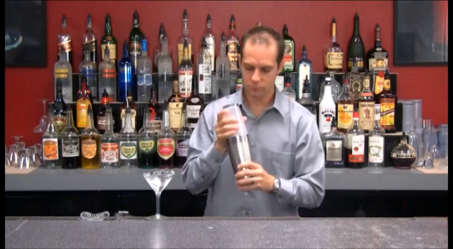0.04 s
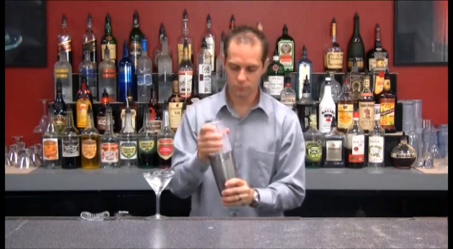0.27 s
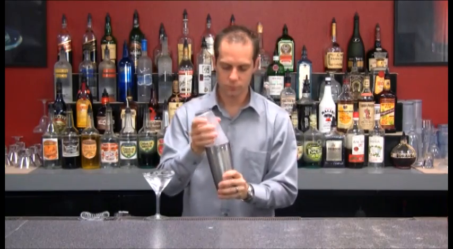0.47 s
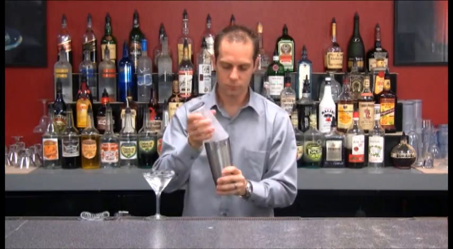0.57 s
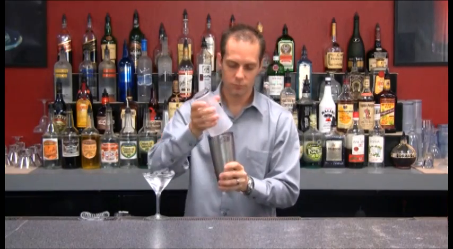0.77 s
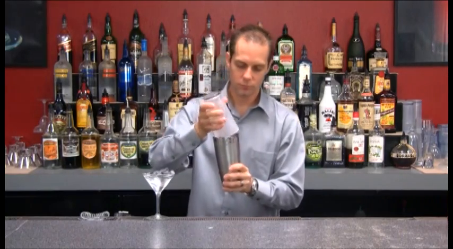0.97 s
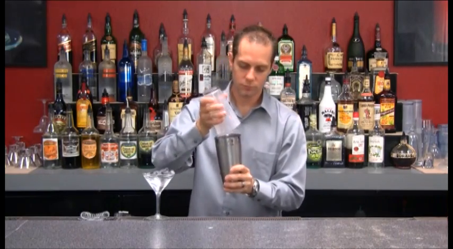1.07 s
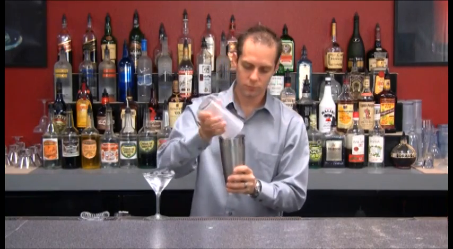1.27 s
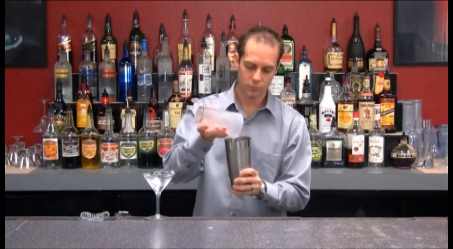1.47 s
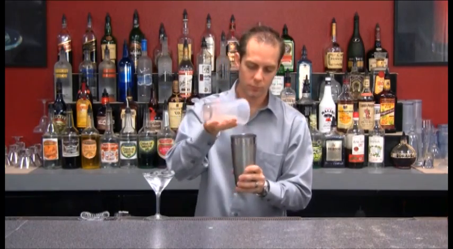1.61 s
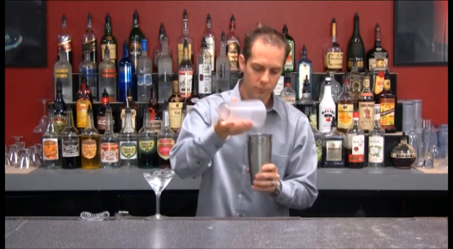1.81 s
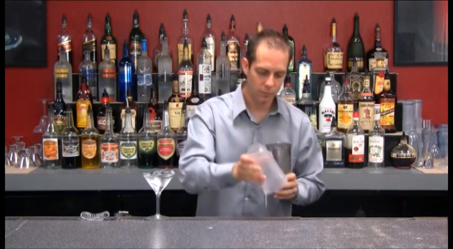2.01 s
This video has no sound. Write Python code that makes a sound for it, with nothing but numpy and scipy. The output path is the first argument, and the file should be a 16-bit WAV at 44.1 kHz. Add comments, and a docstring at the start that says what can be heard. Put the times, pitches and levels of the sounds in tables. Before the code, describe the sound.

An ice-filled cocktail shaker: ice settles in a brief grainy rattle, two hard knocks crack the seal, then faint ice ticks and small glass-on-steel clinks, in a live bar room with low ventilation hum, a little distant.

```python
"""A small bar room: a glass is wedged in a steel cocktail tin full of ice. The ice settles after the last shake
in grainy clusters of collisions. Two blows of the hand jolt it and break the seal: bursts of crack and short damped
modes. The glass is worked loose with faint hollow rubs of fuzzy tone, and clinks on the tin as it is lifted off:
a tick, a knock and a steel ring. Ventilation hums in the background: coloured noise and fan tones."""
import sys
import numpy as np
from scipy import signal
from scipy.fft import rfft, irfft, next_fast_len
from scipy.io import wavfile
from scipy.ndimage import uniform_filter1d

SR = 44100
rng = np.random.default_rng(int(sys.argv[2]) if len(sys.argv) > 2 else 0)


def master(y):
    """Save y as 16-bit WAV."""
    cut = np.clip(np.atleast_2d(y).T, -1, 1)
    pcm = np.round(cut * 32767)  # scale
    wavfile.write(sys.argv[1], SR, pcm.astype(np.int16))


N = 90404  # length of the scene [samples]
T = np.arange(SR * 3 // 4) / SR  # clock of one struck sound and its room tail [s]

# Contacts of the first blow, on the sealed shaker: t/s, level/dB, crack decay setting/s
SEALED_CONTACTS = [(.2285, -34.5, .012), (.2308, -19, .014), (.2330, -5, 0.013)]
# Contacts of the second blow, which frees the glass: t/s, level/dB, crack decay setting/s
FREED_CONTACTS = [(.4035, -25.5, 0.024), (.4081, -18, 0.016)]
# Short resonances of the full shaker, sealed: f/Hz, level/dB, t60/s
SEALED_RESONANCES = [(655, -14, .035), (1535, -18, .04), (1620, -14, .05), (1985, -21, .03),
                     (2220, -18, .035), (2335, -18, .035), (3715, -13, .03), (3980, -12, .028),
                     (4180, -18, .03), (4400, -17, .028), (5318, -18, .03), (5612, -10, .028)]
# The same once freed: f/Hz, level/dB, t60/s
FREED_RESONANCES = [(561, -12, .06), (813, -14, .05), (1690, -11, .05), (3228, -14, .05), (3873, -16, .035),
                    (4116, -13, .035), (4468, -13, .03), (4812, -8, .026), (5471, -8, .02)]
# Colour of the sealed cracks: f/Hz, relative level per Hz/dB
SEALED_CRACK_COLOUR = [(100, -24), (300, -9), (480, -9), (680, -3), (1250, -9), (1700, -2), (2300, -4),
                       (3000, -9), (4000, 1), (4900, -6), (5700, -1), (6400, -8), (8000, -11), (9000, -24),
                       (15000, -30)]
# Colour of the freed cracks: f/Hz, relative level per Hz/dB
FREED_CRACK_COLOUR = [(100, -25.5), (400, -7), (1000, -6), (2000, -6.5), (2700, -6), (5000, 1.5),
                      (6200, -9.5), (8000, -15), (9500, -28.5), (14000, -29.5)]
SEALED_RING_DB, FREED_RING_DB = 1, -2  # resonances against the cracks


def blow(contacts, resonances, colour, ring_db):
    """A blow of the hand slams ice and glass against the tin; hand and liquid damp the ring."""
    out = np.zeros((2, N))
    for start, db, decay in contacts:
        impact = coloured(crack(decay), colour)
        body = amp(ring_db) * ring(resonances)
        add(out, start, in_room(amp(db) * (impact + body)))
    return out


# Ice shifting inside: t/s, level/dB, rise/s, t60/s, brightness/dB per octave, resonance f/Hz, resonance level/dB
ICE_SHIFTS = [(0, -33.5, 0.00053, 0.044, 4.5, 5620, 12.5), (.009, -35.5, 0.002, 0.11, 1, 1810, 7),
              (0.029, -43.5, 0.0085, 0.2, 2.5, 5700, 10), (.0633, -28, 0.0013, .016, 0.5, 1910, 6),
              (0.0983, -44, 0.00027, .012, -1.5, 3840, 10), (.13, -38, 0.00046, .012, -2.5, 3330, 9),
              (0.163, -40.5, 0.0034, 0.047, -3.5, 1953, 13), (0.1879, -41.5, 0.00042, 0.029, -3, 1292, 13),
              (0.212, -39, 0.0023, .06, -4.5, 700, -3), (0.2181, -34.5, 0.005, 0.14, -2.5, 1708, 2.5),
              (0.2423, -25.5, .002, 0.07, -4, 2410, 4.5), (.26, -31.5, .012, 0.26, 2, 4396, 1),
              (0.5098, -40.5, 0.00058, 0.016, -2, 2160, 16), (0.5896, -43, 0.00025, 0.056, -2.5, 293, 18),
              (0.6567, -39, 0.00058, 0.01, -2.5, 1950, 9), (0.694, -53.5, 0.0032, 0.12, -2.5, 2000, 9),
              (.727, -46, .003, 0.099, -4, 2230, 6), (0.8764, -51, .0003, 0.093, -2.5, 1000, 13.5)]
# Common colour of the ice: f/Hz, relative level per Hz/dB
ICE_TONE = [(150, -24), (600, -1.5), (1100, -6), (1800, -2.5), (2600, -6), (3500, -3), (4400, -1),
            (5100, -8), (5700, -3), (6400, -8), (7500, -11), (9500, -22.5), (15000, -37)]
ICE_GRAINS_PER_S, ICE_HISS = 1300, 1  # average collision rate; hiss rms against the grains
ICE_PEAK_OCTAVES = 0.14  # spread of an ice resonance


def ice():
    """Each shift of the cubes is a short cluster of tiny collisions with a resonance of its own."""
    out = np.zeros((2, N))
    for start, db, rise, t60, tilt_db, peak_hz, peak_db in ICE_SHIFTS:
        env = fade(t60, rise)
        collides = rng.random(len(T)) < ICE_GRAINS_PER_S / SR
        grains = unit(collides * rng.standard_normal(len(T)))
        cluster = env * (grains + ICE_HISS * rng.standard_normal(len(T)))
        cluster = cluster * np.linalg.norm(env) / np.linalg.norm(cluster)  # same energy as the envelope
        shift = coloured(cluster, ICE_TONE, tilt_db, peak_hz, peak_db)
        add(out, start, in_room(amp(db) * shift))
    return out


# Glass against the tin: t/s, tick level/dB, tick decay setting/s, ring level/dB, body level/dB,
# place struck (0 wall - 1 rim)
GLASS_TAPS = [(0.7154, -37.5, .022, -54.5, -55, 0.34), (1.0802, -44.5, .03, -50, -51.5, 0),
              (1.2725, -26.5, 0.024, -33.5, -30.5, 0), (1.4166, -26.5, 0.013, -74, -33.5, 0.38),
              (1.4208, -33.5, 0.034, -36.5, -42, 0.91)]
# The steel's ring: f/Hz, level struck on the wall/dB, level struck on the rim/dB, t60/s
STEEL_RING = [(1790, -6, -18, .07), (1967, -2, -8, .22), (2020, -6, -16, .06), (3458, -19, -17, .22),
              (4020, -9, -11, .04), (4392, -4, 0, .22), (4430, 1, -11, .045), (5556, -21, -20, .14),
              (7492, -10, -13, .27), (7560, -12, -16, .08), (11335, -31, -21, .13)]
# The hollow of the tin: f/Hz, level struck on the wall/dB, level struck on the rim/dB, t60/s
TIN_HOLLOW = [(282, -10, -13, 0.075), (347.4, -3, -8, 0.19), (527.4, -5.5, -10, .1), (604, -4.5, -4, 0.074),
              (849, -19, -41, 0.17), (1007, -3, -2.5, 0.064), (1157, -10, 6, 0.029)]
# Colour of the ticks: f/Hz, relative level per Hz/dB
TICK_COLOUR = [(120, -13.5), (300, -8), (600, -7.5), (1150, -1.5), (1500, -2.5), (2200, -2.5), (2800, -6.5),
               (3900, -2), (5000, -5), (5800, -1.5), (6900, -11.5), (8000, -7), (9200, -21), (15000, -28)]


def struck(modes, place):
    """Where the tin is struck sets how strongly each mode is excited."""
    return ring([(hz, wall + place * (rim - wall), t60) for hz, wall, rim, t60 in modes])


def clinks():
    """The glass taps the open tin: a tick, a hollow knock and a ring that depends on the place struck."""
    out = np.zeros((2, N))
    for start, db, decay, ring_db, body_db, place in GLASS_TAPS:
        tick = amp(db) * coloured(crack(decay), TICK_COLOUR)
        steel = amp(ring_db) * struck(STEEL_RING, place)
        knock = amp(body_db) * struck(TIN_HOLLOW, place)
        add(out, start, in_room(tick + steel + knock))
    return out


# Faint hollow rubbing as the glass is worked loose: t of the crest/s, swell length/s, f/Hz, level/dB
RUB_SWELLS = [(0.785, 0.029, 846, -57), (0.816, 0.095, 533, -60.5)]
RUB_WIDTH_HZ = 52


def rubs():
    """Soft swells of hollow tone from the glass turning in the tin."""
    t = np.arange(N) / SR
    out = np.zeros(N)
    for crest, length, hz, db in RUB_SWELLS:
        swell = np.exp(-((t - crest) / length) ** 2)
        out += amp(db) * swell * narrow(hz, RUB_WIDTH_HZ)
    return out


# Colour of the ventilation: f/Hz, relative level per Hz/dB
AIR_COLOUR = [(15, -61), (25, -28), (70, -15), (102, -2.5), (137, -10.5), (180, -9), (206, -21),
              (242, -12.5), (326, -21), (363, -13.5), (427, -21), (714, -24.5), (1130, -30.5), (1400, -32),
              (16000, -47.5)]
# Left-right likeness of the ventilation: f/Hz, likeness (0-1)
AIR_LIKENESS = [(40, .7), (80, .5), (160, .75), (350, .67), (700, .25), (1200, .05), (2600, .3), (5000, .4),
                (14000, .15)]
# Fan tones: f/Hz, level/dB, width/Hz
FAN_TONES = [(108, -62.5, 9.7), (191, -66, 10), (357, -68.5, 14)]
AIR_DB = -52  # rms over both channels


def ventilation():
    """Steady rumble and hiss with a few fuzzy fan tones."""
    air = unit(spread(rng.standard_normal((2, N)), AIR_COLOUR, AIR_LIKENESS))
    hum = sum(amp(db) * narrow(hz, width) for hz, db, width in FAN_TONES)
    return amp(AIR_DB) * air + hum


# Decay of the room's tail, before its closing linear fade: f/Hz, t60/s
ROOM_DECAY = [(200, .55), (600, .5), (1500, 0.48), (4000, 0.47), (9000, 0.35), (15000, .37)]
# Colour of the tail: f/Hz, level over the direct sound/dB
TAIL_COLOUR = [(150, 2), (600, -11.5), (1000, -8.5), (1600, -3.5), (2400, -4.5), (3700, -5), (4700, -8),
               (5700, -6), (7000, -8.5), (9000, -4), (12000, -1), (15000, -9)]
# Left-right likeness of the tail: f/Hz, likeness (0-1)
TAIL_LIKENESS = [(350, .78), (700, .43), (1200, .22), (2600, .38), (4000, .7), (7300, .8), (10000, .9),
                 (15000, .9)]
# Left-right scatter of the direct sound and its bounce: f/Hz, level/dB
SIDE_SCATTER = [(350, -39.5), (1200, -17.5), (4000, -19), (7000, -20), (10000, -20.5), (15000, -25.5)]
SCATTER_DECAY_S = 0.008
ROOM_GAP_S, ROOM_BUILD_S = 0.0017, 0.011  # silence before the tail, time constant of its build-up
COUNTER_S, COUNTER_DB = 0.00344, -13  # bounce off the bar top
RADIATE_HZ = 171  # the shaker is too small to radiate well below this


def room_tail():
    """A fresh stereo reverberation: noise that dies at its own rate in each band."""
    hz, t, z = signal.stft(rng.standard_normal((2, len(T))), SR, nperseg=256)
    decay = np.exp(-np.log(1000) * t / along(ROOM_DECAY, hz)[:, None])
    tail = signal.istft(z * decay, SR, nperseg=256)[1][:, :len(T)]
    build = 1 - np.exp(-np.maximum(T - ROOM_GAP_S, 0) / ROOM_BUILD_S)
    tail = levelled(tail * build) * (1 - T / T[-1])
    return spread(tail / np.linalg.norm(tail[0]), TAIL_COLOUR, TAIL_LIKENESS)


def in_room(x):
    """The direct sound, its bounce off the bar top and a fresh tail of the room."""
    x = signal.sosfilt(signal.butter(2, RADIATE_HZ, 'high', fs=SR, output='sos'), x)
    tail = room_tail()
    bounce = np.pad(x, (round(COUNTER_S * SR), 0))[:len(T)]
    near = x + amp(COUNTER_DB) * bounce
    scatter = crack(SCATTER_DECAY_S)
    scatter = scatter / np.linalg.norm(scatter)
    side_gain = amp(along(SIDE_SCATTER, np.fft.rfftfreq(len(T), 1 / SR)))
    side = irfft(rfft(near) * rfft(scatter) * side_gain, len(T))
    reverb = signal.fftconvolve(x[None], tail, axes=1)[:, :len(T)]
    return np.array([near + side, near - side]) + reverb


CRACK_RISE_S, RING_RISE_S = 0.0002, 0.0003  # time constants


def crack(decay):
    """A dying burst of micro-contacts, its spectrum evened out."""
    env = fade(decay, CRACK_RISE_S)
    z = rfft(env * rng.standard_normal(len(T)))
    even = irfft(z / (abs(z) + 1e-12), len(T))
    even = even * np.exp(-T / decay)  # evening spreads the burst in time; this gathers it again
    return even * np.linalg.norm(env) / np.linalg.norm(even)


def ring(modes):
    """Damped sine modes, each at a random phase."""
    out = np.zeros(len(T))
    for hz, db, t60 in modes:
        tone = np.sin(2 * np.pi * (hz * T + rng.random()))
        out += amp(db) * fade(t60, RING_RISE_S) * tone
    return out


def narrow(hz, width_hz):
    """A fuzzy tone of rms 1: noise under a narrow resonance curve."""
    f = np.fft.rfftfreq(N, 1 / SR)
    noise = rfft(rng.standard_normal(N))
    return unit(irfft(noise / (1 + (2 * (f - hz) / width_hz) ** 2), N))


def coloured(x, points, tilt_db=0, peak_hz=1000, peak_db=0):
    """Causal colour, with an optional slope and resonance, that keeps the power of white noise."""
    n = len(T)
    hz = np.fft.rfftfreq(2 * n, 1 / SR)
    octaves = np.log2(np.maximum(hz, 200) / peak_hz)
    peak = peak_db * np.exp(-(octaves / ICE_PEAK_OCTAVES) ** 2)
    gain = unit(amp(along(points, hz) + tilt_db * octaves + peak))
    cep = irfft(np.log(gain + 1e-6))
    cep[1:n] *= 2  # fold the cepstrum: minimum phase, no pre-ringing
    cep[n + 1:] = 0
    return irfft(rfft(x, 2 * n) * np.exp(rfft(cep)))[:n]


def spread(pair, spectrum, alike):
    """Two noises become left and right with a given colour and likeness."""
    hz = np.fft.rfftfreq(pair.shape[1], 1 / SR)
    turn = np.arccos(np.clip(along(alike, hz), -1, 1)) / 2
    shaped = rfft(pair) * amp(along(spectrum, hz))
    mid, side = irfft(shaped * [np.cos(turn), np.sin(turn)], pair.shape[1])
    return np.array([mid + side, mid - side])


def levelled(x, size=48):
    """x with its broad spectral ripple evened out over size bins."""
    z = rfft(x)
    power = np.abs(uniform_filter1d(abs(z) ** 2, size))
    return irfft(z / np.sqrt(power + 1e-12), x.shape[-1])


def fade(t60, rise):
    """Quick rise, exponential decay."""
    return np.exp(-np.log(1000) * T / t60) * (1 - np.exp(-T / rise))


def along(points, hz):
    """Read (f/Hz, value) points on a log frequency axis."""
    f, v = np.transpose(points)
    return np.interp(np.log(hz + 1), np.log(f + 1), v)


def amp(db):
    """Decibels to amplitude."""
    return 10 ** (np.asarray(db) / 20)


def unit(x):
    """Scale x to rms 1."""
    return x / np.sqrt(np.mean(x ** 2) + 1e-20)


def add(out, start, x):
    """Mix x into out from time start [s]."""
    i = max(round(start * SR), 0)
    out[:, i:i + x.shape[-1]] += x[..., :N - i]


def scene():
    """The shaker sounds from straight ahead, over the ventilation."""
    sealed = blow(SEALED_CONTACTS, SEALED_RESONANCES, SEALED_CRACK_COLOUR, SEALED_RING_DB)
    freed = blow(FREED_CONTACTS, FREED_RESONANCES, FREED_CRACK_COLOUR, FREED_RING_DB)
    return sealed + freed + ice() + clinks() + rubs() + ventilation()


PEAK_TOP, TOP_HZ = 0.85, 15700  # ceiling of the soft limiter, upper band limit


def record(dry):
    """Peaks round off softly towards a ceiling, then everything above the band limit is cut."""
    x = dry / (1 + (dry / PEAK_TOP) ** 6) ** (1 / 6)
    m = next_fast_len(N + SR // 2)
    passes = np.fft.rfftfreq(m, 1 / SR) < TOP_HZ
    return irfft(rfft(x, m) * passes, m)[:, :N]


dry = scene()
out = record(dry)
master(out)
```